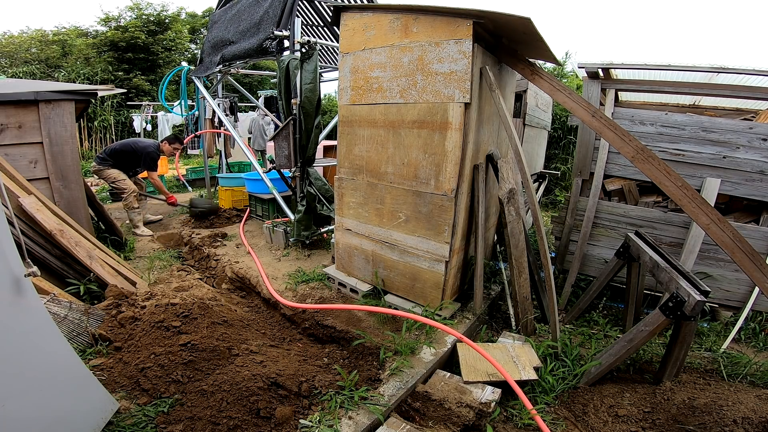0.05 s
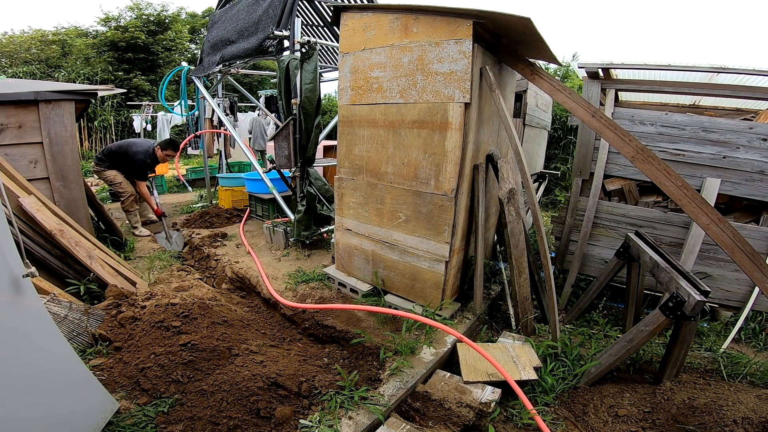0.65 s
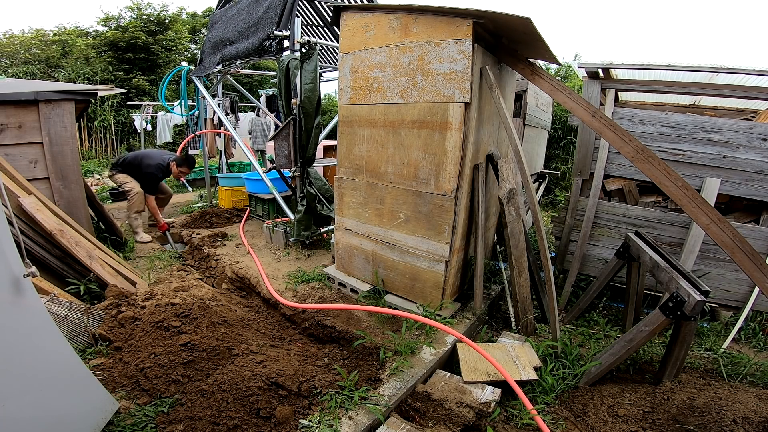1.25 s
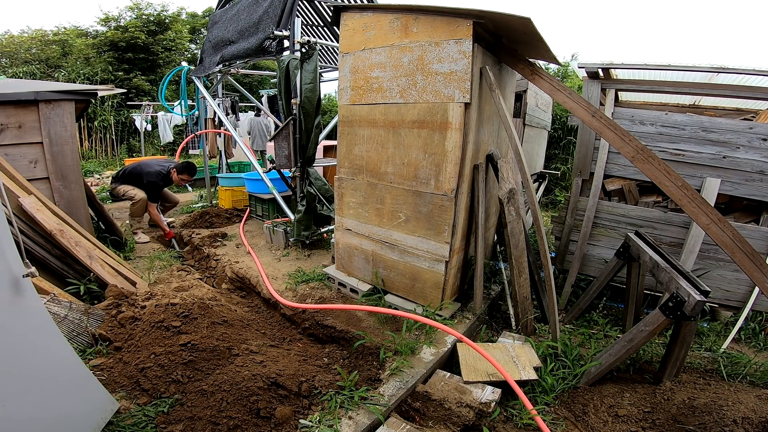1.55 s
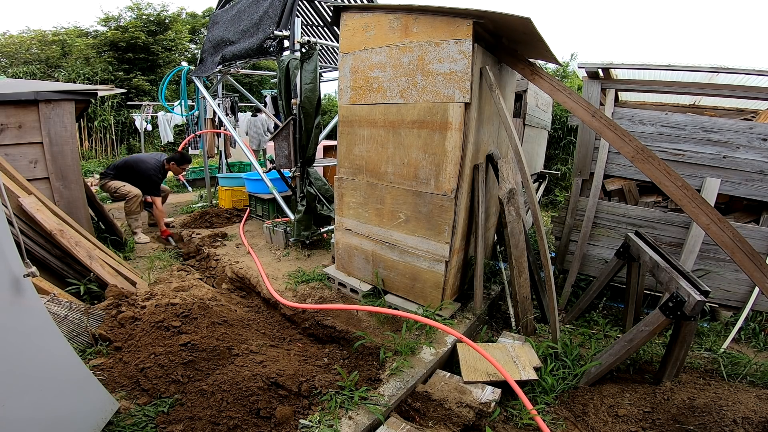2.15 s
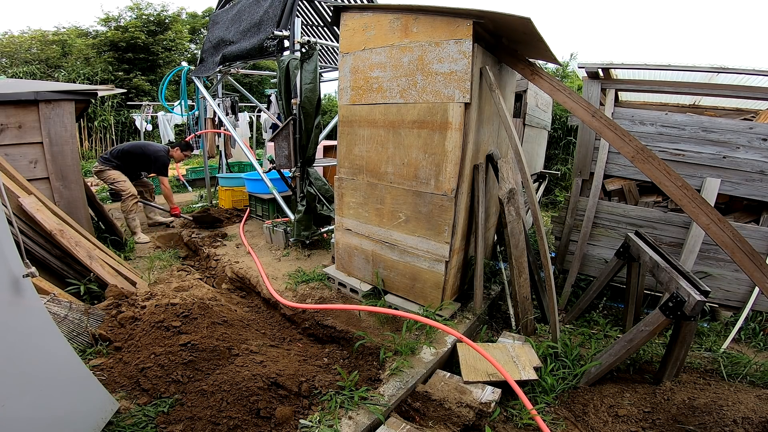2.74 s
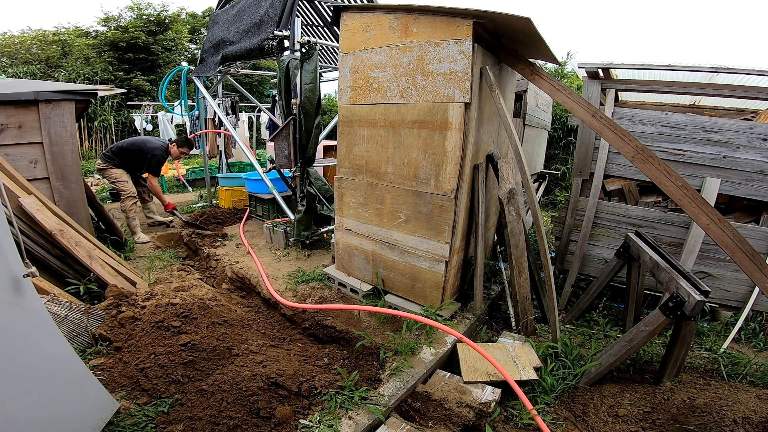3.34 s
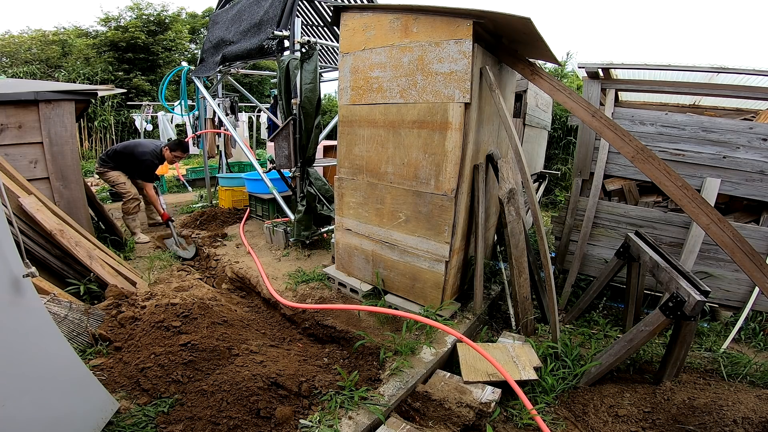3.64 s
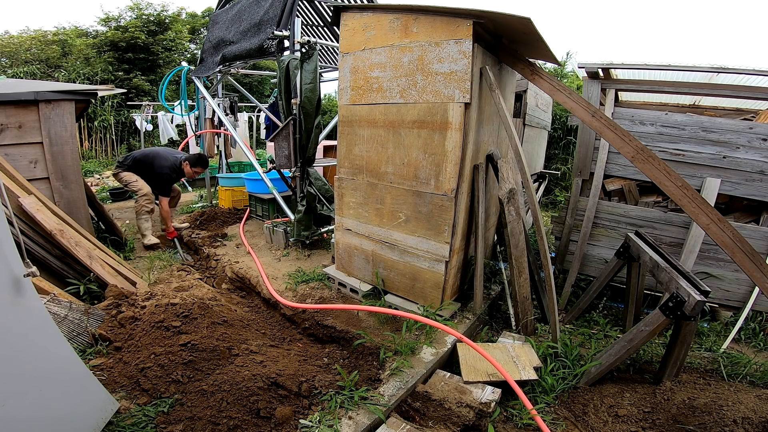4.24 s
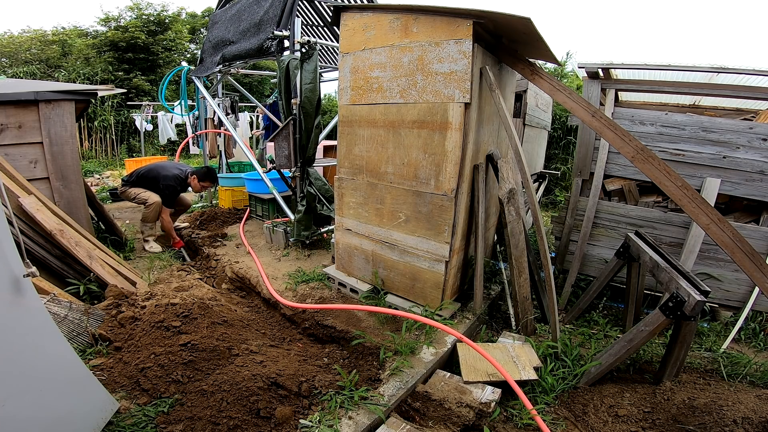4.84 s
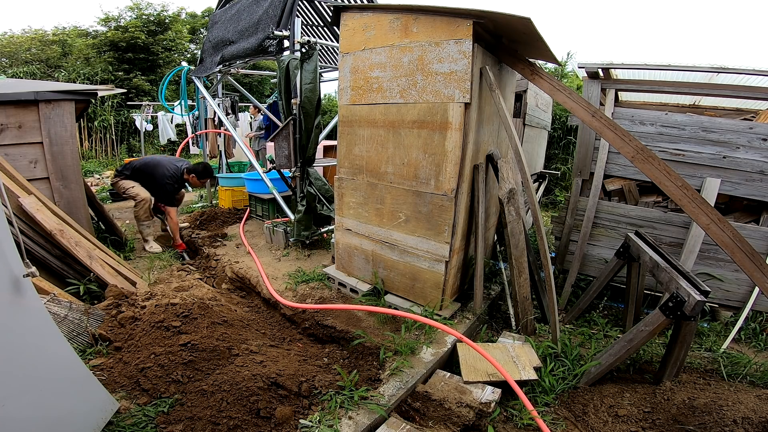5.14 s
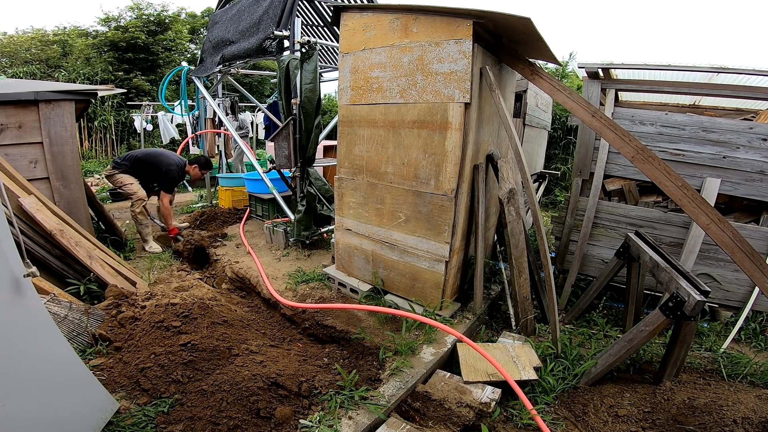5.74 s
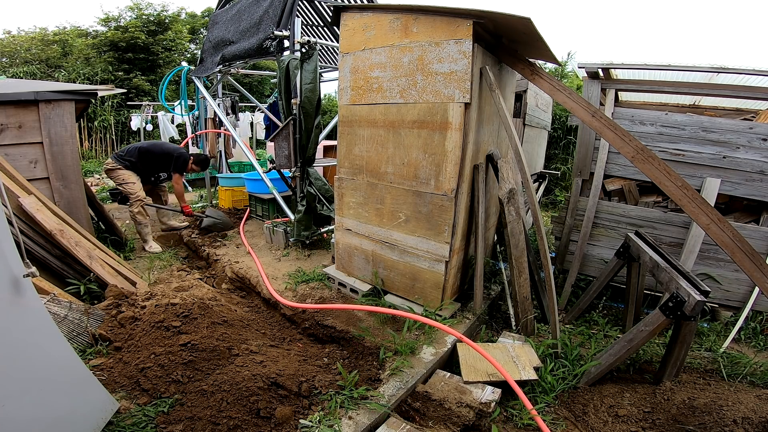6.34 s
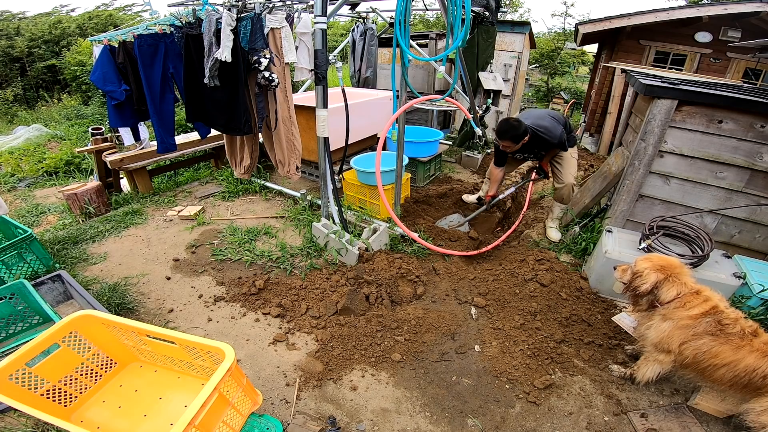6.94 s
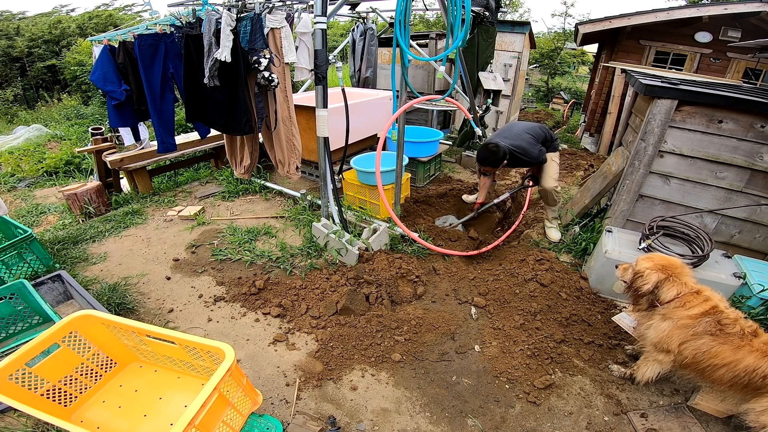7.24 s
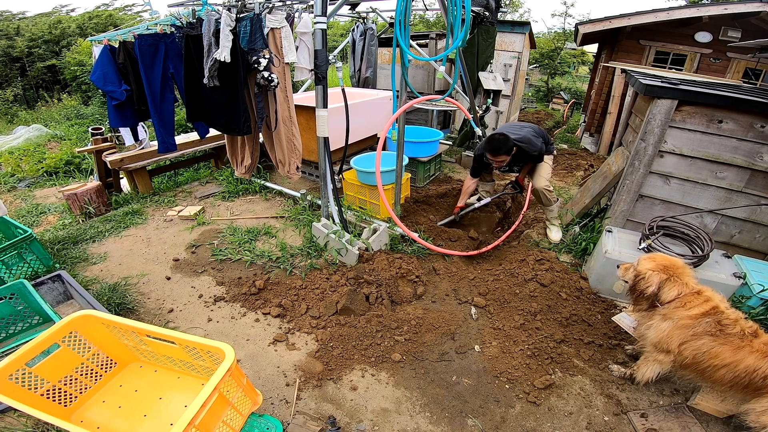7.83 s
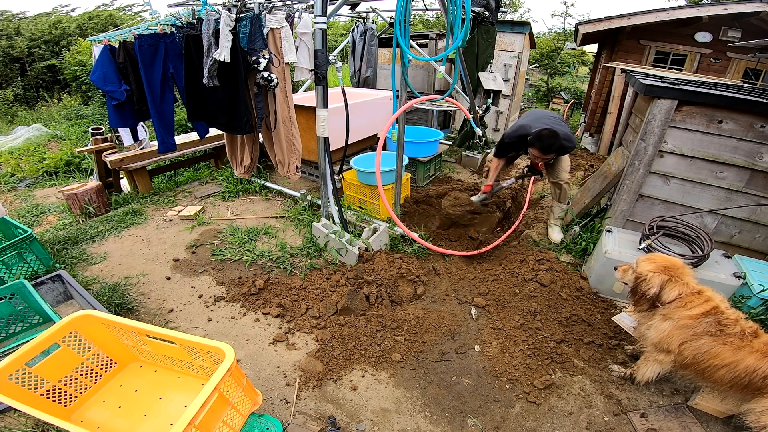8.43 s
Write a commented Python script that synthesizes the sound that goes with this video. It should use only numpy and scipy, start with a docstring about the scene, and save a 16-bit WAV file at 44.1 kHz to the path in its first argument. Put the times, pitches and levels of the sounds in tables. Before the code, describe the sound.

A garden, with faint high insect trilling throughout and digging close by, slightly to the right. A short rumble of wind hits the microphone at the start. From about 0.5 to 1.6 seconds a steel shovel crunches and scrapes into gritty soil, the blade ringing lightly, crumbs pattering and a clod thudding at 1.3 seconds. A small stone clinks at 1.8, and a faint low hum swells twice in the distance. From about 3.3 seconds wind buffets the microphone with a loud, deep rumble and irregular thumps, strongest between 4 and 5.5, over softer scrapes. The shovel bites sharply at 6.3. At about 6.8 the wind cuts off and the surroundings turn calm. A growing scrape with sliding soil ends in a crunch near 7.4 seconds, followed by faint distant bird chirps and a few light knocks until about 8.4.

```python
"""A garden between wooden sheds. Close to the microphone a steel shovel scrapes into soil and throws it on
a heap: grit rasps and rings the blade, crumbs patter, clods thud. Insects sing in the grass; far off, a
low hum comes and goes. Wind buffets the microphone, which fades between its open stereo ports and a
sheltered, duller mono port. Near the end the spot changes to a calm one, with the digger to the right
and small birds in the distance."""
import sys
import numpy as np
from scipy import signal
from scipy.fft import rfft, irfft
from scipy.io import wavfile
from scipy.ndimage import uniform_filter1d

SR = 44100
rng = np.random.default_rng(int(sys.argv[2]) if len(sys.argv) > 2 else 0)


def generate_wav(sig):
    """Save sig (samples, or channels by samples) to the path in sys.argv[1] as 16-bit PCM at SR."""
    pcm = np.round(np.clip(np.atleast_2d(sig).T, -1, 1) * 32767).astype(np.int16)
    wavfile.write(sys.argv[1], SR, pcm)


N = 373968
TIME = np.arange(N) / SR
SLOW_TIME = TIME[::40]   # clock for the envelopes
FREQS = np.maximum(np.fft.rfftfreq(N, 1 / SR), 1)
MOVE_S = 6.757   # the microphone changes to the calm spot
OPPOSITE = np.array([[1], [-1]])   # plus on the left, minus on the right

# Levels in the tables are relative: each layer is trimmed in the mix.
# the blade slides through soil; free steel rings, buried steel rasps at a pitch set by its depth:
# (start [s], length [s], level [dB], growth [dB], t60 [s], ring [dB], rasp pitch [Hz], rasp [dB])
BLADE_STROKES = [(0.01, 0.56, -58.5, -4.5, 1.2, -18, 1400, -3),
                 (0.65, 0.14, -45.3, 2.5, 0.15, 3, 3800, -11), (0.797, .06, -42, 4, .13, -4, 4100, -8),
                 (0.87, .41, -49, -4, .3, -7, 3700, -8), (1.268, 0.265, -49.8, 4, 1.0, -12, 3000, -6),
                 (1.97, 0.25, -62, -0.5, 0.92, -10, 3000, -10), (2.89, 0.3, -64, 0, .2, -4, 3400, 0),
                 (3.185, .04, -57, 7, .14, -8, 3400, 3), (3.522, .035, -50.5, 1, .11, -10, 3400, 3),
                 (3.6, .035, -61, 0, .12, -10, 3300, 6), (3.78, .02, -55, 0, .1, 0, 2900, 3),
                 (3.82, 0.17, -53, -3, 0.22, -10, 3200, -2), (4.125, .02, -58, -4, 0.15, -10, 3000, -3),
                 (4.235, 0.44, -56, -1, 0.5, -14, 3400, -3), (5.015, 0.065, -58.5, 0, 0.6, -12, 3900, -5),
                 (5.195, 0.075, -55.5, 2, .4, -16, 2300, -4), (5.31, .11, -59.5, 0, .8, -16, 3000, -9),
                 (5.585, 0.046, -59, -5, 0.25, -8, 4200, -5), (5.715, .03, -62, 1, .4, -6, 3000, -3),
                 (6.08, 0.41, -64.5, 2, .5, -5, 3400, -8), (6.48, 0.12, -57.5, -7, 2.5, -8, 3400, -8),
                 (6.873, 0.045, -51, 5, 0.5, -10, 3200, -3), (7.04, .08, -55.5, 3, .4, -2, 3100, -9),
                 (7.105, 0.36, -46.6, 11.5, 0.42, -12, 3050, -0.5), (7.51, .08, -58, -4, .1, -14, 2600, -3),
                 (7.72, .08, -63, 4, 0.5, -12, 2500, -6)]
# the edge bites into gritty ground: (time [s], level [dB], t60 [s], treble gain [dB])
EDGE_BITES = [(0.45, -37.5, 0.071, -14), (.8225, -30.5, 0.08, 10), (.846, -35, 0.06, 19),
              (1.072, -30, 0.048, 14.5), (5.066, -43, 0.09, -8), (6.285, -25.5, 0.11, -7),
              (6.375, -48, 0.13, 6), (6.876, -55.5, 0.19, 20.5), (6.993, -44, 0.09, -12),
              (7.437, -45, 0.23, 23.5), (8.339, -48, 0.17, 16)]
# resonances of the free blade: (frequency [Hz], width [Hz], level [dB])
BLADE_MODES = [(1120, 45, -2), (1357, 24, 7), (1700, 40, -8), (1890, 38, 0), (2130, 70, -9), (2620, 36, -1),
               (2790, 40, -5), (2930, 50, -5), (3290, 80, 0), (3500, 110, -3), (3868, 65, 3),
               (4064, 55, -1), (4325, 65, 2), (4600, 90, 0), (5090, 100, -2), (5830, 80, -3),
               (7580, 100, -3), (8500, 130, -3)]
# grit on steel: (frequency [Hz], level [dB])
GRIT_SPECTRUM = [(400, -15), (900, -4.5), (1500, 0), (3000, -2), (4500, -3), (5500, -1.5), (6450, 1.5),
                 (7400, 0.5), (8500, 0), (9200, -3.5), (11000, -13.5), (15500, -27)]
# a load of soil shifts or falls, and the hollow of soil and blade rings with it:
# (start [s], length [s], level [dB], growth [dB], t60 [s], hollow pitch [Hz], hollow [dB])
SOIL_LOADS = [(0.783, 0.06, -41, 1.5, 0.5, 367, 3), (1.017, 0.37, -54, -10, 0.48, 370, -5),
              (1.39, 0.23, -53, 1, .7, 657, 16), (6.866, 0.082, -54.5, 0, 0.33, 420, 4),
              (7.05, 0.41, -52.5, 18, 0.45, 425, 10)]
# loose soil: (frequency [Hz], level [dB])
SOIL_SPECTRUM = [(120, -2), (250, 2), (420, 1), (650, -1), (950, -6), (1500, -27), (3000, -30)]
# clods, boots and the shaft knock dully: (time [s], level [dB], pitch [Hz], t60 [s])
KNOCKS = [(.808, -38, 370, 0.14), (.824, -38, 1050, .07), (.843, -38, 950, .06), (.865, -40, 193, 0.11),
          (.895, -41, 500, 0.04), (1.31, -27, 227, 0.06), (1.314, -36.5, 380, 0.088),
          (6.286, -38, 950, .07), (6.922, -44, 131, 0.48), (6.925, -42, 230, .08), (7.44, -42, 950, .1),
          (8.216, -48, 740, 0.06), (8.216, -49, 1400, 0.045), (8.275, -46, 97, 0.13)]
# likeness of the digging on left and right: (frequency [Hz], correlation [-1 to 1])
DIG_CORRELATION = [(300, 1), (1400, 0.047), (3100, 1), (6800, 0.0038), (12000, 0.082)]
# reflections from the shed walls: (delay [s], level [dB])
SHED_ECHOES = [(.0062, -21), (.0135, -13.5), (0.022, -15.5), (.041, -12.5)]

# gusts strike the ports: (start [s], length [s], rumble [dB], flutter over the rumble [dB])
PORT_GUSTS = [(0.008, 0.165, -28, -27), (0.365, 0.06, -43, -35), (1.39, .13, -50, -46),
              (2.763, 0.4, -52, -46), (3.235, 0.06, -39, -42), (3.29, .16, -32, -35),
              (3.445, 0.175, -24.5, -20), (3.505, .025, -28, -7), (3.62, 0.14, -40, -42),
              (3.848, .065, -21, -15), (3.948, .06, -20, -13), (4.035, .025, -27, -11),
              (4.06, .06, -26, -24), (4.165, .05, -33, -32), (4.218, .075, -17, -15),
              (4.305, .03, -21, -20), (4.335, 0.065, -18.5, -6), (4.415, .08, -22, -7),
              (4.5, 0.14, -18.5, -2), (4.64, .045, -22, -2), (4.73, 0.05, -27, -13), (4.84, 0.075, -25, -4),
              (4.917, .025, -18, -13), (4.983, .045, -21, -2), (5.063, .025, -21.5, -7),
              (5.108, .03, -21, -3), (5.155, .03, -24, -9), (5.235, 0.065, -21, -6),
              (5.343, .06, -19.5, -8), (5.448, 0.06, -26, -14), (5.545, .04, -28, -12),
              (5.62, 0.035, -28, -2), (5.688, 0.08, -26.5, -9), (5.79, .025, -30, -24),
              (5.882, .015, -39, -9), (5.908, .022, -32, -5), (5.935, .025, -25, -24),
              (5.962, 0.055, -27, -2), (6.113, .02, -36, -1), (6.145, 0.035, -28, -20),
              (6.255, 0.1, -36, -20), (6.375, .025, -31, -19), (6.495, 0.235, -25.5, -12.5),
              (6.92, 0.15, -59, -35)]
# single slaps of wind: (time [s], thump [dB], flick [dB])
WIND_SLAPS = [(0.068, -27, -58), (0.15, -26, -56), (0.508, -29, -68), (0.739, -28, -68), (3.504, -22, -51),
              (3.555, -23, -65), (3.876, -19, -51), (3.969, -14, -48), (4.234, -16, -44),
              (4.34, -16, -38.5), (4.533, -17, -34), (4.583, -14, -30), (4.662, -24, -31),
              (4.757, -21, -44), (4.852, -22, -39), (4.906, -18, -37), (4.926, -11, -46), (4.984, -19, -34),
              (5.069, -14, -38.5), (5.113, -15, -33), (5.239, -13, -36), (5.349, -18, -38),
              (5.362, -12, -39), (5.69, -24, -44), (5.726, -22, -42), (5.966, -24, -33), (6.013, -27, -41),
              (6.116, -30, -42.5), (6.635, -16.5, -45)]
# the breeze between the gusts: (time [s], level [dB])
BREEZE_LEVEL = [(0.0, -29), (0.32, -44), (1.63, -42), (2.27, -51), (3.3, -41.5), (3.43, -30), (3.79, -38),
                (4.2, -27), (4.5, -19.5), (5.35, -22.5), (5.85, -31), (6.57, -31), (6.74, -54)]
# rows for swell, rumble and flutter: (level in a light breeze [dB], rise [dB per dB of breeze])
BREEZE_RESPONSE = [(-43.5, 0.64), (-47, 0.94), (-74.5, 1.72)]
# turbulence at the ports, deepest first: (frequency [Hz], level [dB])
SWELL_SPECTRUM = [(10, -15.5), (28, 3.5), (50, 1.5), (80, -1), (130, -22), (250, -44), (600, -87),
                  (3000, -130)]
RUMBLE_SPECTRUM = [(30, -25), (55, -4), (80, 2), (130, 1), (190, -3.5), (260, -20), (400, -34.5),
                   (900, -76.5), (4000, -120)]
FLUTTER_SPECTRUM = [(110, -18), (210, 8.3), (330, 1), (500, -9), (750, -23.3), (1200, -31.5), (2000, -46),
                    (4000, -70), (12000, -115)]
# the side that the wind strikes: (time [s], gain added on the left and taken from the right [dB])
WIND_LEAN = [(2.7, 0), (3.3, 1), (3.8, 2.3), (4.2, .7), (4.6, -0.27)]
# extra width of the open ports in wind: (frequency [Hz], side gain [dB])
PORT_WIDTH = [(30, 1), (90, -.5), (220, 2.5), (400, 7), (700, 14), (1300, 9.5), (2400, 5)]
# the fade to the sheltered port: (time [s], share [0-1])
SHELTER_SHARE = [(1.6, 1), (1.7, 0.85), (2.3, .5), (3.1, 0.26), (4.25, 0.07), (4.62, 0.61), (4.76, 0.73),
                 (5.45, 1)]
# response of the sheltered port: (frequency [Hz], gain [dB])
SHELTER_RESPONSE = [(1000, 2.3), (3000, 2.2), (4500, 1.2), (5100, -9), (5900, -19), (6800, -19.5),
                    (7800, -16.5), (9500, -10), (11000, -3), (12000, 0), (13500, -2), (15000, -9)]

# the nearer insects: (pitch [Hz], width [Hz], level [dB], pulsing share [0-1])
INSECT_BANDS = [(8750, 700, -71, .2), (9220, 320, -62, .8), (9650, 240, -62, .95), (10350, 700, -72, .6)]
# the insect chorus at each spot: (frequency [Hz], level [dB])
WINDY_CHORUS_SPECTRUM = [(4410, -22), (7000, -8), (7800, -11), (8500, -4), (9410, -3), (10700, -8),
                         (11400, -14), (12300, -17), (14700, -18), (15500, -20)]
CALM_CHORUS_SPECTRUM = [(4000, -57), (6800, -13), (7140, -20), (8020, -4.5), (9020, 0), (10300, -10.5),
                        (11400, -25), (14100, -27), (15500, -29)]
# level of the high insect trill as heard; it dips as the microphone fades to the sheltered port:
# (time [s], gain [dB])
TRILL_HEARD_LEVEL = [(0, 2.5), (1.5, 2.5), (3, 2), (4.2, -0.5), (4.7, -5.5), (5.3, 1), (5.9, 3.3), (6.7, 5)]
# small birds far off: (start [s], length [s], level [dB], start pitch [Hz], end pitch [Hz])
BIRD_CALLS = [(7.6, .07, -65, 3200, 2600), (7.68, .17, -66, 5100, 4950), (7.89, .09, -69, 3330, 3250),
              (8.04, .09, -72, 4500, 4400), (8.11, .06, -71, 3700, 3350)]
# a low hum in the distance: (time [s], level [dB])
HUM_LEVEL = [(0, -64), (1.0, -52.5), (1.5, -47), (1.85, -56), (2.4, -61.5), (2.85, -46), (3.4, -56)]
# distant air and leaves at each spot: (frequency [Hz], level [dB])
WINDY_AIR_SPECTRUM = [(65, -42), (110, -9.5), (181, -3), (315, -5), (420, -10), (538, -13.5), (654, -8.5),
                      (1450, -18), (1840, -20), (2360, -24.5), (3430, -23), (4820, -25), (6530, -20.5),
                      (7800, -41.5), (10100, -57.5), (17200, -120)]
CALM_AIR_SPECTRUM = [(35, -49), (60, -17), (177, 4), (410, -4.5), (522, -15), (554, -12), (844, -8.5),
                     (1010, -14), (2160, -20.5), (3100, -19.5), (4110, -22), (4360, -20), (4630, -22.5),
                     (7200, -24.5), (9360, -46), (15800, -120)]
# likeness of the background on left and right: (frequency [Hz], correlation [-1 to 1])
AIR_CORRELATION = [(100, -0.14), (300, 0.9), (700, -0.34), (1400, -0.46), (3100, 0.33), (6500, -0.091),
                   (12000, -0.59)]


def shovel():
    """Close up, the blade slides through grit in uneven slips and crunches where its edge bites."""
    grit = stereo_field(grains(per_s=1700, size_db=-1.0), GRIT_SPECTRUM, DIG_CORRELATION)
    grit = steady(grit, span_s=0.11)
    slips = from_db(0.7 + 1.1 * drift(70) + 0.4 * drift(21))
    return slips * strokes(grit) + from_db(-7.5) * bites(grit)


def strokes(grit, rasp_width=0.32, upper_ratio=2.06):
    """Each push hisses and rings the steel; the buried edge sticks and slips, rasping in two bands."""
    judder = from_db(2.6 * drift(160))
    out = np.zeros((2, N))
    for start, length, db, growth_db, t60, ring_db, rasp_hz, rasp_db in BLADE_STROKES:
        span = slice(int(start * SR), int((start + length + t60) * SR))
        hiss = grit[:, span]
        ring = blade_ring(hiss, ring_db)
        lower = resonance(hiss, rasp_hz, rasp_width * rasp_hz)
        upper = resonance(hiss, upper_ratio * rasp_hz, rasp_width * rasp_hz)
        # reversed in time, the rasp is unrelated to the hiss
        rasp = rms_one(judder[span] * lower[:, ::-1] - from_db(1) * upper[:, ::-1])
        push = at_samples(envelope(start, length, attack_s=0.011, t60=t60, growth_db=growth_db))
        out[:, span] += from_db(db) * push[span] * rms_one(hiss + ring + from_db(rasp_db) * rasp)
    return out


def bites(grit, split_hz=5500):
    """The edge strikes the ground: a short crunch of grit and steel with its own share of treble."""
    out = np.zeros((2, N))
    for start, db, t60, treble_db in EDGE_BITES:
        span = slice(int((start - 0.003) * SR), int((start + t60) * SR))
        crunch = rms_one(grit[:, span] + blade_ring(grit[:, span], ring_db=-9))
        body = butterworth(crunch, 2, split_hz, "low")
        treble = from_db(treble_db) * butterworth(crunch, 2, split_hz, "high")
        strike = burst(TIME[span] - TIME[span.start], rise_s=0.01, t60=t60)
        out[:, span] += from_db(db) * strike * (body - treble)
    return out


def blade_ring(grit, ring_db, buried_db=-20, sag=0.04, damping=1.2):
    """Grit rings the steel; a fainter ring means more soil on it, which lowers and widens its modes."""
    load = np.clip(ring_db / buried_db, 0, 1)
    # each contact favours other modes
    contact_db = 2.5 * rng.standard_normal(len(BLADE_MODES)) * np.sqrt(load)
    ring = 0
    for (hz, width_hz, db), extra_db in zip(BLADE_MODES, contact_db):
        mode = resonance(grit, hz * (1 - sag * load), width_hz * (1 + damping * load))
        ring += from_db(db + extra_db) * mode
    return from_db(ring_db) * steady(ring, span_s=0.064)


def grains(per_s, size_db):
    """Crumbs and sand tick at random, per_s times a second on each side in each of seven bands."""
    edges_hz = np.geomspace(150, 16000, 8)
    out, count = 0, int(2 * per_s * N / SR)
    for band in zip(edges_hz, edges_hz[1:]):
        sizes = from_db(size_db * np.minimum(rng.exponential(1, count), 4))
        ticks = np.zeros((2, N))
        ticks.flat[rng.integers(0, 2 * N, count)] = sizes * rng.choice([-1, 1], count)
        out += butterworth(ticks + 1e-18, 2, band, "band")
    return out


def earth(hollow_width_hz=60):
    """Loose soil patters as it shifts, with a hollow note; heavier things land with a thud."""
    crumbs = stereo_field(grains(per_s=600, size_db=3.5), SOIL_SPECTRUM, DIG_CORRELATION)
    patter = 0
    for start, length, db, growth_db, t60, hollow_hz, hollow_db in SOIL_LOADS:
        hollow = from_db(hollow_db) * resonance(crumbs, hollow_hz, hollow_width_hz)
        flow = at_samples(envelope(start, length, attack_s=0.035, t60=t60, growth_db=growth_db))
        patter += from_db(db) * flow * rms_one(crumbs + hollow)
    thuds = bumps(KNOCKS, rise_s=0.0036, spread=0.4)[0]
    return from_db(-1.5) * patter + from_db(-3) * thuds


def pebble(start_s=1.758):
    """One small stone clinks on the steel and sets a high mode of the blade ringing."""
    strike = white()[0] * burst(TIME - start_s, rise_s=0.001, t60=0.08)
    ring = resonance(strike, hz=4820, width_hz=170)
    return from_db(-47) * ring / np.abs(ring).max()


def shed_walls(direct):
    """Wooden walls a few metres off add early echoes to the direct sound."""
    return direct + sum(from_db(db) * np.pad(direct, ((0, 0), (int(delay * SR), 0)))[:, :N]
                        for delay, db in SHED_ECHOES)


def wind():
    """Each port has its own turbulence: a deep swell, a rumble, lumpy flutter and single slaps."""
    swell_gain, rumble_gain, flutter_gain = airflow()
    swell = from_db(1) * swell_gain * steady(colour(white(), SWELL_SPECTRUM), span_s=0.079)
    rumble = colour(white(), RUMBLE_SPECTRUM) * from_db(3.4 * drift(45))
    rumble = from_db(0.5) * rumble_gain * steady(rumble, span_s=0.05)
    flutter = colour(white(), FLUTTER_SPECTRUM) * from_db(5.2 * np.tanh(drift(70)))
    flutter = flutter_gain * steady(flutter, span_s=0.05) * from_db(0.3 + 2 * np.tanh(drift(22)))
    lean = from_db(at_time(WIND_LEAN) * OPPOSITE)
    return lean * (swell + rumble + flutter + slaps())


def airflow(fade_s=0.018, light_breeze_db=-41.5, calm_db=(-64.5, -70, -94), lead_s=0.008):
    """Gains of swell, rumble and flutter: gusts add power to a breeze, faint at the calm spot."""
    windy = np.clip(np.minimum(SLOW_TIME, MOVE_S - SLOW_TIME) / fade_s, 0, 1)
    rise_db = np.interp(SLOW_TIME, *np.transpose(BREEZE_LEVEL)) - light_breeze_db
    swell, rumble, flutter = (windy * from_db(db + slope * rise_db) + (1 - windy) * from_db(still_db)
                              for (db, slope), still_db in zip(BREEZE_RESPONSE, calm_db))
    for start, length, db, flutter_db in PORT_GUSTS:
        strength = from_db(db) * (windy if start < MOVE_S else 1)
        push = strength * envelope(start - lead_s, length + lead_s, attack_s=0.022, t60=0.17)
        eddies = strength * envelope(start, length, attack_s=0.007, t60=0.09)
        # slow gusts push deep, fast ones flutter
        swell = np.hypot(swell, push * from_db(-16.5 - 0.7 * flutter_db))
        rumble = np.hypot(rumble, push)
        flutter = np.hypot(flutter, eddies * from_db(flutter_db))
    return at_samples(swell), at_samples(rumble), at_samples(flutter)


def slaps(thump_hz=175, thump_t60=0.07, flick_hz=445, flick_t60=0.085):
    """Wind slaps the ports: a low thump with a brief flick on top."""
    thump_rows = [(time - 0.008, db, thump_hz, thump_t60) for time, db, _ in WIND_SLAPS]
    flick_rows = [(time - 0.003, db, flick_hz, flick_t60) for time, _, db in WIND_SLAPS]
    thumps = bumps(thump_rows, rise_s=0.0024, spread=0.43)
    flicks = bumps(flick_rows, rise_s=0.0022, spread=0.43)
    return from_db(-2) * thumps + from_db(6.5) * flicks


def near_insects(trill_hz=29.5):
    """Nearby insects trill in narrow bands, each swelling and flickering in its own way."""
    out, rasp = 0, white()
    wingbeats = (0.5 + 0.5 * np.cos(2 * np.pi * trill_hz * TIME + 0.7 * drift(6))) ** 3
    for hz, width_hz, db, pulsing in INSECT_BANDS:
        song = rms_one(resonance(resonance(rasp, hz, width_hz), hz, width_hz))
        trill = 1 - pulsing + pulsing * wingbeats
        out += song * trill * from_db(db + 1.8 * drift(1.7) + 1.6 * drift(26))
    return out


def birds():
    """Faint, distant whistles that swell, glide down and waver."""
    out, waver = np.zeros(N), 1 + 0.022 * drift(400)
    for start, length, db, start_hz, end_hz in BIRD_CALLS:
        span = (TIME >= start) & (TIME < start + length)
        progress = (TIME[span] - start) / length
        hz = (start_hz + (end_hz - start_hz) * progress) * waver[span]
        out[span] += from_db(db) * np.sin(np.pi * progress) * np.sin(2 * np.pi * np.cumsum(hz) / SR)
    return out


def far_hum(hz=69, close_db_per_s=1500):
    """A low, wavering tone swells twice in the distance, then stops quickly."""
    past_end_s = np.maximum(TIME - HUM_LEVEL[-1][0], 0)
    gain = from_db(at_time(HUM_LEVEL) - np.minimum(close_db_per_s * past_end_s, 200))
    return gain * np.sqrt(2) * np.sin(2 * np.pi * hz * TIME + 0.61 * drift(7.3))


def garden():
    """Distant air, leaves and an insect chorus at both spots; near insects and hum at the windy one."""
    insects = from_db(-59) * stereo_field(white(), WINDY_CHORUS_SPECTRUM, AIR_CORRELATION)
    insects += near_insects()
    windy = from_db(at_time(TRILL_HEARD_LEVEL)) * insects + far_hum()
    windy += from_db(-53.5) * stereo_field(white(), WINDY_AIR_SPECTRUM, AIR_CORRELATION)
    calm = from_db(-55.84) * stereo_field(white(), CALM_AIR_SPECTRUM, AIR_CORRELATION)
    calm_chorus = stereo_field(white(), CALM_CHORUS_SPECTRUM, AIR_CORRELATION)
    calm += from_db(-55.5 + 1.4 * drift(80)) * calm_chorus
    return np.where(TIME < MOVE_S, windy, calm)


def bumps(rows, rise_s, spread):
    """Band-limited bursts of pressure on two ports, from (time [s], peak [dB], pitch [Hz], t60 [s])."""
    age = TIME[:SR // 2]
    out = np.zeros((2, N + len(age)))
    for time, peak_db, hz, t60 in rows:
        push = rng.standard_normal((2, len(age))) * burst(age, rise_s, t60)
        body = butterworth(push, 3, [hz / (1 + spread), hz * (1 + spread)], "band")
        start = int(time * SR)
        out[:, start:start + len(age)] += from_db(peak_db) * body / np.abs(body).max(1, keepdims=True)
    return out[:, :N]


def envelope(start, length, attack_s, t60, growth_db=0):
    """On the slow clock: attack, a hold that changes most at first, and an exponential release."""
    age = SLOW_TIME - start
    held_db = growth_db * (np.clip(age / length, 0, 1) ** 0.62 - 0.5)
    released_db = 60 * np.clip((age - length) / t60, 0, 3)
    return np.clip(age / attack_s, 0, 1) * from_db(held_db - released_db)


def burst(age, rise_s, t60):
    """A quick rise and an exponential decay."""
    return np.clip(age / rise_s, 0, 1) * from_db(-60 * np.clip(age / t60, 0, 3))


def stereo_field(pair, spectrum, correlation):
    """Two unrelated signals become a coloured stereo sound of rms 1."""
    mid, side = rfft(pair) * from_db(at_hz(spectrum))
    alike = at_hz(correlation)
    return rms_one(irfft(np.sqrt(1 + alike) * mid + np.sqrt(1 - alike) * side * OPPOSITE, N))


def colour(x, spectrum):
    """Filter by a table of (frequency [Hz], gain [dB])."""
    return irfft(rfft(x) * from_db(at_hz(spectrum)), N)


def resonance(x, hz, width_hz):
    """Two-pole band-pass with gain 1 on top."""
    radius = np.exp(-np.pi * width_hz / SR)
    feedback = [1, -2 * radius * np.cos(2 * np.pi * hz / SR), radius ** 2]
    return signal.lfilter(np.array([1, 0, -1]) * (1 - radius ** 2) / 2, feedback, x)


def butterworth(x, order, hz, kind):
    """Low-, high- or band-pass with a flat top."""
    return signal.sosfilt(signal.butter(order, hz, kind, fs=SR, output="sos"), x)


def steady(x, span_s):
    """Even out the slow swells of a noise."""
    return x / np.sqrt(uniform_filter1d(np.mean(x ** 2, axis=0), int(span_s * SR)) + 1e-9)


def white():
    """A pair of white noises."""
    return rng.standard_normal((2, N))


def drift(per_s):
    """A random wander of rms 1."""
    knots = rng.standard_normal(4096)
    return rms_one(np.interp(TIME * per_s, np.arange(len(knots)), knots))


def at_hz(table):
    """A table read at every frequency, on a log axis."""
    hz, value = np.transpose(table)
    return np.interp(np.log(FREQS), np.log(hz), value)


def at_time(table):
    """A table read at every sample."""
    return np.interp(TIME, *np.transpose(table))


def at_samples(control):
    """A control on the slow clock read at every sample."""
    return np.interp(TIME, SLOW_TIME, control)


def from_db(db):
    """Decibels to gain."""
    return np.exp(np.asarray(db) * (np.log(10) / 20))


def rms_one(x):
    """Scale to unit rms."""
    return x / np.sqrt(np.mean(x ** 2) + 1e-20)


def scene():
    """Digging to the right, the garden around it and wind, through the open and the sheltered ports."""
    digging = shed_walls(shovel() + earth() + pebble()) * from_db([[-3.0], [2.2]])
    airborne = digging + garden() + birds()
    wind_left, wind_right = wind()
    wind_mid = (wind_left + wind_right) / 2
    # the close-set ports are spread into stereo, which magnifies their unrelated turbulence
    wind_side = colour((wind_left - wind_right) / 2, PORT_WIDTH) * OPPOSITE
    open_ports = airborne + wind_mid + wind_side
    sheltered_port = colour(airborne.mean(axis=0) + wind_mid, SHELTER_RESPONSE)
    shelter = at_time(SHELTER_SHARE) * (TIME < MOVE_S)
    return shelter * sheltered_port + (1 - shelter) * open_ports


def record(dry):
    """The top is cut steeply above 15450 Hz."""
    return signal.sosfilt(signal.ellip(10, 0.1, 80, 15450, fs=SR, output="sos"), dry)


dry = scene()
out = record(dry)
generate_wav(out)
```